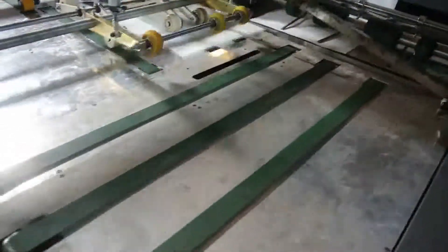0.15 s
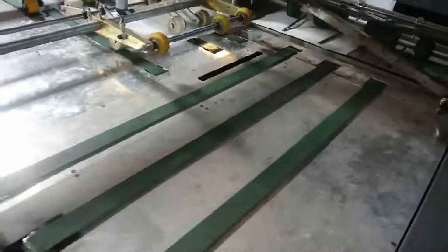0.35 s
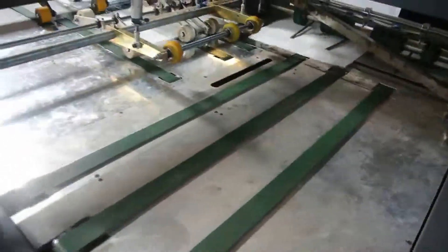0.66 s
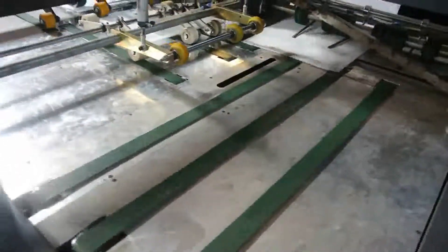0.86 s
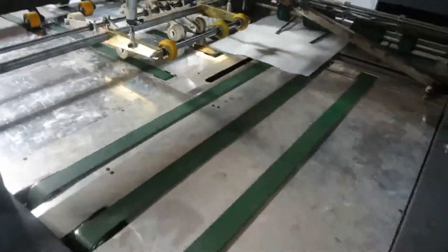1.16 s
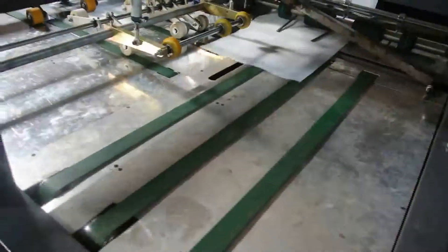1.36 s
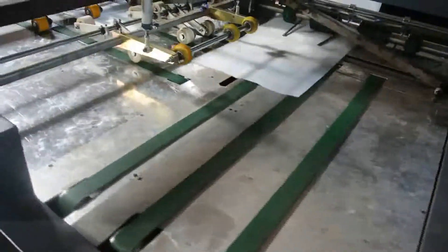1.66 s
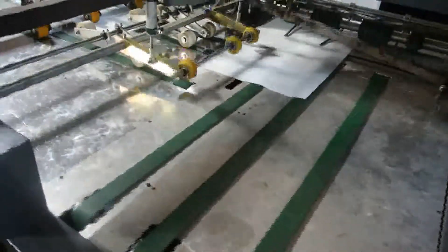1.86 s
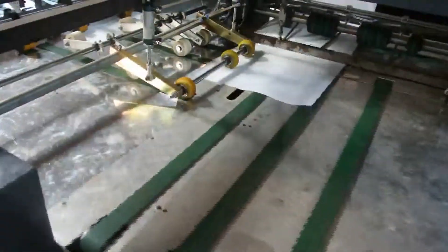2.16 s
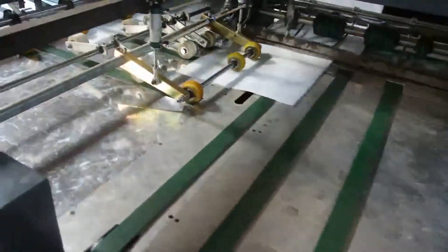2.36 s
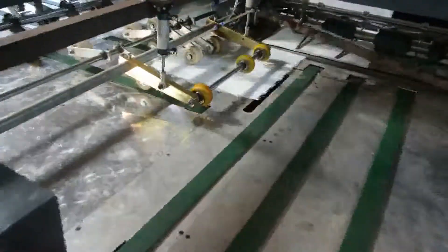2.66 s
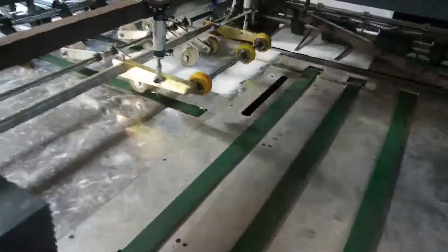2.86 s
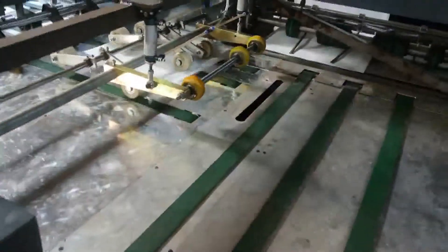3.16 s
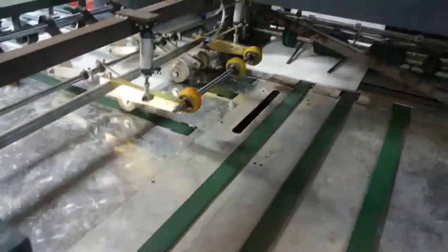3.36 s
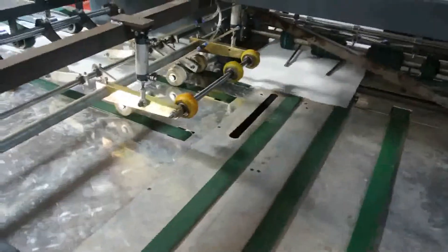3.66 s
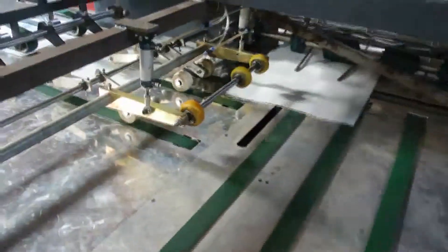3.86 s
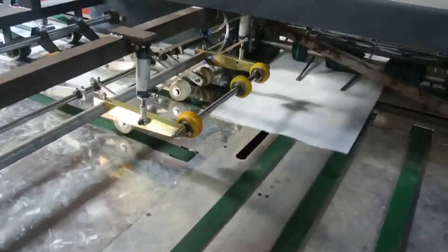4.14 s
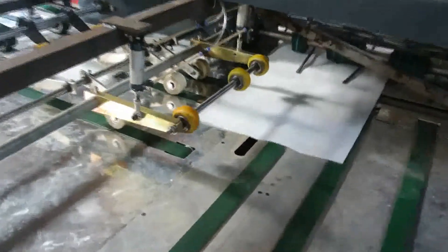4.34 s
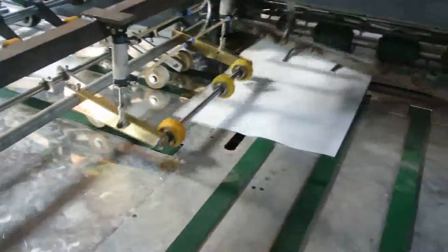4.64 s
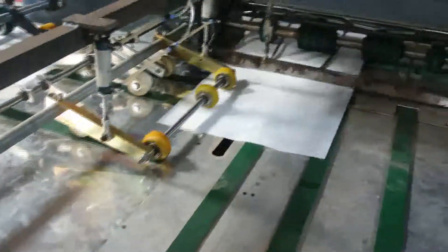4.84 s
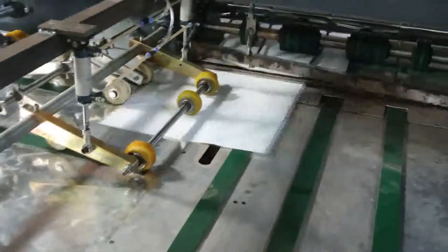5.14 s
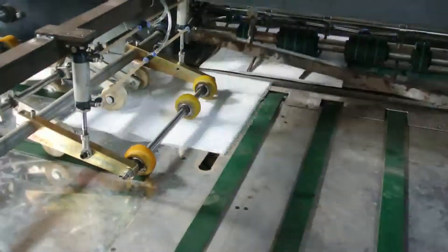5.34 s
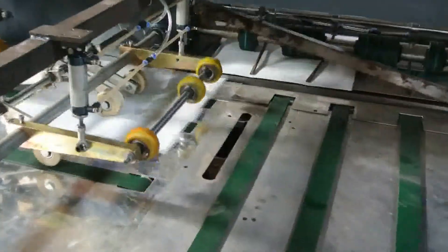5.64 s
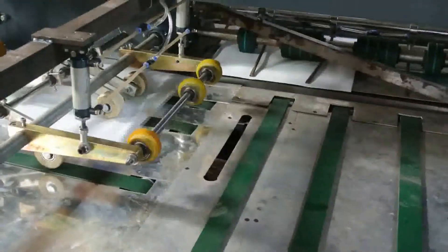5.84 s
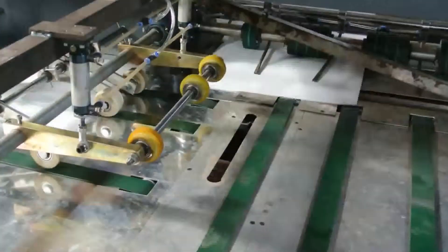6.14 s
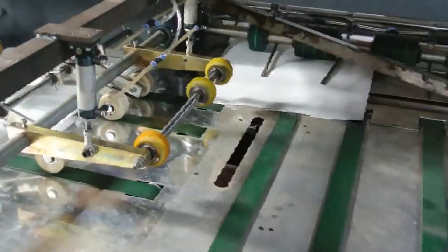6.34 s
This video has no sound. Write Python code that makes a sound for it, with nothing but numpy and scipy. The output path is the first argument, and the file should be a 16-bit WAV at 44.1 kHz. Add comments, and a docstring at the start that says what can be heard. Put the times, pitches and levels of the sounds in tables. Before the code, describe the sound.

An automatic pneumatic machine runs close by in a slightly reverberant workshop, its drive and conveyor belts rumbling softly with a faint motor hum throughout. It opens on a fading puff of air and a brief whistle. At about 0.5 seconds a valve snaps with a dull knock and releases a long, bright hiss, which ends in a spit at 1.7 seconds. A thin, wavering squeal follows, with short puffs, quick falling chirps and rasping rods. At 2.5 seconds a sharper rasp and puff lead into a short, swelling whistle. The valve snaps again at 3.2 seconds, and air blasts until about 4.4. The squeal, puffs and chirps return, followed by another rasp and whistle from 5.2 seconds. Near 6 seconds a softer snap starts a third blast, still hissing at the end.

```python
"""A workshop floor, close to a bag making machine running through its 2.75 s cycle.
A valve snaps and dumps a long blast of air; then the cylinders move, with short puffs,
falling chirps, rasping rods, a squealing throttle and a whistling port.
Under the air, the drive and its conveyor belts rumble on."""
import sys
import numpy as np
from scipy import signal
from scipy.fft import rfft, irfft, next_fast_len
from scipy.io import wavfile
from scipy.ndimage import uniform_filter1d, map_coordinates

SR = 44100
rng = np.random.default_rng(int(sys.argv[2]) if len(sys.argv) > 2 else 0)


def store_pcm(level_fs):
    """Save levels as 16-bit WAV."""
    pcm = np.round(np.clip(level_fs, -1, 1) * 32767).astype(np.int16)
    wavfile.write(sys.argv[1], SR, np.atleast_2d(pcm).T)


N = 286638

# valve snaps: t/s, snap level/dB, thump level/dB
SNAPS = [(0.4966, -11.5, -30), (3.227, -11.5, -53), (5.9686, -24.5, -55)]
# return strokes: t/s, air level/dB, end-stop spit/dB, whistle f/Hz, whistle level/dB,
# time to its peak/s, its swell/(dB/s), force of the down stroke before/dB
RETURN_STROKES = [(-0.236, 1, -32.5, 2045, -40.5, .42, 1, 0), (2.508, 1, -40, 2077, -36.5, 0.313, 52, 0),
                  (5.242, -1, -40, 2082, -32.5, 0.35, 37.5, 1)]


def amp(db):
    """Decibels to gain."""
    return 10 ** (np.asarray(db) / 20)


def unit(x):
    """Scale to rms 1."""
    return x / np.sqrt(np.mean(np.abs(x) ** 2) + 1e-20)


def along(points, hz):
    """Read (f/Hz, value) points on a log frequency axis."""
    freqs, values = np.transpose(points)
    return np.interp(np.log(hz + 1), np.log(freqs + 1), values)


def clock():
    """Time of every sample."""
    return np.arange(N) / SR


def since(start):
    """Seconds since start, zero before it."""
    return np.maximum(clock() - start, 0)


def held(start, db, rise, hold, t60):
    """Envelope that opens, holds and dies away."""
    return amp(db - 60 * since(start + hold) / t60) * (1 - np.exp(-(since(start) / rise) ** 2))


def burst(start, db, rise, t60):
    """Envelope that opens and dies away with no hold."""
    return held(start, db, rise, 0, t60)


def together(gains):
    """Independent air streams add in power."""
    return np.sqrt(sum(gain ** 2 for gain in gains))


def wobble(rate):
    """A smooth random curve, rate knots a second."""
    return map_coordinates(rng.standard_normal(int(N * rate / SR) + 4), [clock() * rate])


def eq(points):
    """Frequency response through (f/Hz, level/dB) points."""
    return lambda hz: amp(along(points, hz))


def filtered(x, response):
    """Shape x with a frequency response."""
    size = next_fast_len(N + 8192)
    return irfft(rfft(x, size) * response(np.fft.rfftfreq(size, 1 / SR)), size)[..., :N]


def rush(response, spread, patchy_db):
    """Turbulent stereo noise, patchy in time and frequency; spread sets side over mid."""
    spectra = signal.stft(rng.standard_normal((2, N)), nperseg=1024)[2]
    patches = uniform_filter1d(rng.standard_normal(spectra.shape[1:]), size=3, axis=0)
    patches = unit(uniform_filter1d(patches, size=14, axis=1))
    noise = signal.istft(spectra * amp(patchy_db * patches), nperseg=1024)[1][:, :N]
    mid, side = filtered(noise, response)
    mid, side = unit(mid), filtered(unit(side), eq(spread))
    return np.array([mid + side, mid - side])


def noisy_tone(pitch_hz, width_hz, clean):
    """A band of noise around a fixed or moving pitch; clean is the pure tone's share of the power."""
    real, imag = filtered(rng.standard_normal((2, N)), lambda hz: 1 / (1 + (1.84 * hz / width_hz) ** 2))
    flutter = np.sqrt(clean) + np.sqrt(1 - clean) * unit(real + 1j * imag)
    phase = 2 * np.pi * np.cumsum(np.broadcast_to(pitch_hz, N)) / SR
    return np.sqrt(2) * np.real(flutter * np.exp(1j * phase))


def hall(x, wet_db):
    """Blend a source with the workshop's diffuse reverb."""
    # reverb time: f/Hz, t60/s
    decay = [(200, 0.069), (2000, 0.7), (12000, 0.24)]
    hz, t, spectra = signal.stft(rng.standard_normal((2, SR // 2)), SR, nperseg=256)
    tail = signal.istft(spectra * amp(-60 * t / along(decay, hz)[:, None]), SR, nperseg=256)[1]
    tail = np.pad(tail / np.linalg.norm(tail[0]), ((0, 0), (SR // 300, 0)))  # pre-delay
    wet = signal.fftconvolve(np.atleast_2d(x), tail, axes=1)[:, :N]
    return (x + amp(wet_db) * wet) / np.sqrt(1 + amp(wet_db) ** 2 / 2)


def drive(cycle_s=2.752, fade_db_per_s=0.49):
    """Belts and rollers rumble with each cycle's load, beside unsteady motor tones; the rumble's level drops
    slowly through the scene."""
    # load through one cycle: t after the snap/s, level/dB
    load = [(0, -46.5), (.3, -47), (.5, -48.5), (1.25, -48.5), (1.501, -49.5), (1.63, -42.5), (1.9, -46),
            (2.15, -47.5), (2.7, -46)]
    # rumble colour: f/Hz, level/dB
    colour = [(25, -36), (50, -18.5), (100, -11), (170, -4.5), (380, -0.5), (900, 0), (1500, -1),
              (2200, -2.5), (4000, -7.5), (16000, -11.5)]
    # stereo width: f/Hz, side over mid/dB
    spread = [(40, -10), (160, -21), (600, -12), (1500, -4.5), (4000, -1)]
    # motor and roller tones: f/Hz, level/dB
    hum = [(383, -61.5), (497, -60), (631, -62.5), (829, -59), (1081, -66), (1394, -63), (1666, -60)]
    load_db = np.interp((clock() - SNAPS[0][0]) % cycle_s, *np.transpose(load))
    rumble = rush(eq(colour), spread, patchy_db=2.0)
    tones = sum(amp(db) * noisy_tone(hz, width_hz=12, clean=0.15) for hz, db in hum)
    return amp(load_db + 7.5 - fade_db_per_s * clock() + 0.4 * wobble(16)) * rumble + amp(-3) * tones


def knocks():
    """The frame gives a short, dull knock as each valve trips."""
    gain = sum(burst(start - 0.012, db=-41, rise=0.006, t60=0.2) for start, *_ in SNAPS)
    return gain * noisy_tone(pitch_hz=523, width_hz=330, clean=0)


def rasps(side_hz=3500):
    """The sliding rod rubs with each move: a band of noise, wider in stereo the higher it lies."""
    # rod rubs: t from the return/s, f/Hz, width/Hz, level/dB, rise/s, t60/s
    rubs = [(-.425, 3100, 700, -34, 0.035, 0.69), (-.287, 3600, 650, -30, 0.023, 0.36),
            (-.141, 1903, 1500, -26.5, .004, 0.19), (0, 5000, 560, -10.5, 0.016, .1)]
    out = np.zeros((2, N))
    for delay, hz, width_hz, db, rise, t60 in rubs:
        down_stroke = delay < -0.1
        gain = sum(burst(start + delay, db + force_db * down_stroke, rise, t60)
                   for start, *_, force_db in RETURN_STROKES)
        mid, side = (noisy_tone(hz, width_hz, clean=0) for _ in range(2))
        out += gain * (mid + np.outer([1, -1], side) * hz / side_hz)
    return out


def chirps():
    """The chamber behind a moving piston grows, so its note drops and settles."""
    # piston moves: t from the return/s, first f/Hz, last f/Hz, glide/s,
    # width/Hz, level/dB, rise/s, t60/s
    moves = [(-.4, 2202, 1029, .013, 800, -32.5, 0.013, 0.31),
             (-.289, 3986, 1850, .03, 480, -30.5, 0.013, 0.25),
             (-.139, 2400, 1059, .008, 240, -23.5, .007, 0.12),
             (-.001, 5230, 2160, .044, 360, -25.5, 0.013, .3)]
    out = np.zeros(N)
    for start, *_, force_db in RETURN_STROKES[1:]:
        for delay, first_hz, last_hz, glide, width_hz, db, rise, t60 in moves:
            pitch = last_hz + (first_hz - last_hz) / (1 + (since(start + delay) / glide) ** 3)
            down_stroke = delay < -0.1
            gain = burst(start + delay, db + force_db * down_stroke, rise, t60)
            out += gain * noisy_tone(pitch, width_hz, clean=0.14)
    return out


def whistles(sharp_hz=89.3, settle_s=0.045, sag_hz_per_s=45.4, flutter_db=2.3):
    """The port's whistle starts sharp, settles and sags; it swells, then drops to a faint tail."""
    out = np.zeros(N)
    for stroke, _, _, hz, db, peak_s, swell, _ in RETURN_STROKES:
        start, peak = stroke + 0.1, stroke + peak_s
        pitch = hz + sharp_hz * np.exp(-since(start) / settle_s) - sag_hz_per_s * since(start)
        swell_db = -swell * np.maximum(peak - clock(), 0)
        body = held(start, db + swell_db, rise=0.023, hold=peak - start, t60=0.15)
        tail = held(start, db - 13.5, rise=0.016, hold=0.53, t60=0.26)
        out += together([body, tail]) * noisy_tone(pitch, width_hz=70, clean=0.59)
    return out * amp(-flutter_db * wobble(40))


def throttle(length_s=0.52, push_after_s=0.248, flutter_db=3.0):
    """The throttle's note flutters in the flow and sinks with the pressure; a second push revives it."""
    # down-stroke squeals: t/s, level/dB, rise/s, t60/s, second push/dB
    squeals = [(1.775, -28, .006, 1.1, -43), (4.511, -35, 0.047, 1.9, -28)]
    # pitch bend: t into the squeal/s, f/Hz
    bend = [(0, 3824), (.07, 3590), (.2, 3414), (.3, 3270), (.43, 3480)]
    out = np.zeros(N)
    for start, db, rise, t60, push_db in squeals:
        pitch = np.interp(since(start), *np.transpose(bend))
        push = burst(start + push_after_s, push_db, rise=0.013, t60=0.25)
        release = np.exp(-since(start + length_s) / 0.02)
        gain = together([burst(start, db, rise, t60), push]) * release
        out += gain * noisy_tone(pitch, width_hz=220, clean=0.29)
    return out * amp(flutter_db * wobble(60))


def vent():
    """On each return, escaping air rings the resonances of the narrow port."""
    # port resonances: f/Hz, width/Hz, level/dB
    resonances = [(2670, 1200, -10.5), (3870, 2400, -11), (4700, 400, -5.5), (5000, 210, 0)]

    def port(hz):
        return together(amp(db) / (1 + (2.9 * (hz - centre) / width) ** 2)
                        for centre, width, db in resonances)

    gain = sum(burst(start, air_db - 28, rise=0.04, t60=1.44) for start, air_db, *_ in RETURN_STROKES)
    return gain * amp(2.9 * wobble(40)) * rush(port, spread=[(2500, -5), (5000, 1.5)], patchy_db=2.4)


def return_flow(start, stop_db, travel_s=0.412):
    """Envelope of a return: a puff, a hiss while the piston travels, an end-stop spit, a faint leak."""
    return together([burst(start - 0.006, db=-26.5, rise=0.011, t60=0.62),
                     held(start, db=-41.3, rise=0.02, hold=travel_s, t60=0.54),
                     burst(start + travel_s, stop_db, rise=0.003, t60=0.12),
                     held(start, db=-49.5, rise=0.02, hold=0.28, t60=1.4)])


def bleed(bright_hz=12000, brightening=0.58, neutral_db=-35):
    """Softer puffs from the far cylinders; the stronger the flow, the brighter its hiss."""
    # down-stroke puffs: t/s, level/dB, rise/s, t60/s
    puffs = [(1.73, -30, 0.013, 2.4), (2.005, -32, 0.013, 1.95), (2.211, -27, 0.013, 0.7),
             (4.47, -36.5, 0.013, 12), (4.768, -33, .02, 1.14), (4.95, -26.5, 0.023, 0.89)]
    # hiss colour, down stroke then return: f/Hz, level/dB
    colours = [
        [(880, -34), (1500, -20.5), (2040, -13), (2490, -6.5), (2910, -7.5), (3410, -0.5), (4970, -3),
         (13800, -4), (15100, -6), (16000, -27)],
        [(1000, -38), (2000, -4), (3000, -2.5), (4300, 0), (6000, -2), (9000, -1), (12500, 0.5), (15000, -8),
         (16000, -1)],
    ]
    # stereo width: f/Hz, side over mid/dB
    spread = [(1500, -3), (3500, 1.5), (5000, 0.5), (8000, 1), (15000, -.5)]
    down = together(burst(*puff) for puff in puffs)
    back = together(amp(air_db) * return_flow(start, stop_db)
                    for start, air_db, stop_db, *_ in RETURN_STROKES)
    air = np.zeros((2, N))
    for flow, colour in zip((down, back), colours):
        jet = rush(eq(colour), spread, patchy_db=2.1)
        sizzle = filtered(jet, lambda hz: hz ** 6 / (hz ** 6 + bright_hz ** 6))
        brightness = (flow / amp(neutral_db)) ** brightening
        air += flow * (jet - sizzle + sizzle * brightness)
    return air * amp(2.4 + 0.1 * wobble(64))


def valves(lead_s=0.01):
    """The mechanism thumps the frame; then the valve snaps open with a crack and a brief rattle."""
    # colours: f/Hz, level/dB
    steel = eq([(200, -1), (1500, 8.5), (3500, 7), (6000, 0), (13000, 9)])
    frame = eq([(25, -13), (110, 2.5), (500, -1), (1300, 1), (4000, -29), (12000, -45)])
    crack = np.zeros(N)
    for start, db, _ in SNAPS:
        crack[round(start * SR)] = amp(db + 6)
    rattle = sum(burst(start, db - 8.5, rise=0.0001, t60=0.0075) for start, db, _ in SNAPS)
    thump = sum(burst(start - lead_s, db, rise=0.00069, t60=0.088) for start, _, db in SNAPS)
    steel_noise = unit(filtered(rng.standard_normal(N), steel))
    frame_noise = unit(filtered(rng.standard_normal(N), frame))
    return filtered(crack, steel) + rattle * steel_noise + thump * frame_noise


def blasts(open_s=1.22):
    """The exhaust opens with a kick, surges, settles to a steady hiss and spits as it closes."""
    # exhaust blasts: t/s, surge/dB, surge length/s, steady hiss/dB, spit/dB, left over right/dB
    exhausts = [(0.491, -31, 0.33, -30, -24.5, -0.5), (3.222, -29, 0.41, -29.5, -28.5, -.3),
                (5.964, -29, 0.33, -32.5, -30, 1)]
    # colour of each blast: f/Hz, level/dB
    colours = [
        [(1060, -35), (1800, -15), (1940, -23), (2100, -13), (2820, -6), (3260, -5), (4100, -6), (4410, -4.5),
         (5590, -3.5), (7420, -0.5), (10200, -3.5), (12400, -1.5), (15100, -5), (16000, -7.5)],
        [(1060, -35), (1800, -20), (2060, -11), (2410, -12), (2690, -5.5), (3810, -4.5), (4490, -5),
         (4880, -3.5), (6410, -4), (8440, -0.5), (10100, -4), (13100, -0.5), (15100, -7.5), (16000, -1)],
        [(1060, -37), (1800, -17), (2030, -13.5), (2200, -14), (2790, -7.5), (3440, -8.5), (5060, -4.5),
         (5750, -7.5), (7290, -6.5), (8210, -7.5), (12100, -2), (15000, -5), (16000, -6)],
    ]
    # stereo width of each blast: f/Hz, side over mid/dB
    spreads = [
        [(2000, -5), (8500, -4.3), (11000, -1.5), (15000, 3.5)],
        [(2000, -6), (8500, -3.5), (11000, -1), (15000, 2.5)],
        [(3000, -9), (7500, -2.5), (11500, -4), (15000, -1)],
    ]
    air = np.zeros((2, N))
    for exhaust, colour, spread in zip(exhausts, colours, spreads):
        start, surge_db, surge_s, steady_db, spit_db, pan_db = exhaust
        wisp = held(start - 0.014, db=-33, rise=0.01, hold=0.02, t60=0.05)  # the valve unseats
        kick = burst(start, db=-23, rise=0.018, t60=0.57)
        surge = held(start, surge_db, rise=0.003, hold=surge_s, t60=0.85)
        steady = held(start, steady_db, rise=0.0036, hold=open_s, t60=0.4)
        spit = burst(start + open_s, spit_db, rise=0.0039, t60=0.44)
        pan = amp([[pan_db / 2], [-pan_db / 2]])
        jet = rush(eq(colour), spread, patchy_db=2.0)
        air += pan * together([wisp, kick, surge, steady, spit]) * jet
    return air * amp(2.0 + 0.49 * wobble(35) + 0.25 * wobble(6))


def scene(low_cut_hz=400):
    """Air and machinery in the workshop; the whistle sits a little left, the rods a little right."""
    whistle = amp([[0], [-2.5]]) * hall(whistles(), wet_db=-7.5)
    squeal = amp(-1) * hall(throttle(), wet_db=-0.5)
    chambers = amp(1.5) * hall(chirps(), wet_db=-1.5)
    rods = amp([[-2], [-0.5]]) * hall(rasps(), wet_db=-4.5)
    # the piston sounds are kept clear of bass
    pistons = filtered(chambers + rods, lambda hz: hz ** 2 / (hz ** 2 + low_cut_hz ** 2))
    air = blasts() + bleed() + vent()
    impacts = hall(valves() + knocks(), wet_db=-7)
    return drive() + impacts + pistons + whistle + squeal + air


def record(dry, top_hz=15900):
    """Colour left and right slightly apart and cut the very top."""
    # channel balance: f/Hz, left over right/dB
    balance = [(60, 0.0), (150, -0.5), (380, 0.0), (950, 0), (2380, -1.5), (5980, -0.5), (15000, 4)]
    return filtered(dry, lambda hz: amp(np.outer([0.5, -0.5], along(balance, hz))) * (hz < top_hz))


dry = scene()
out = record(dry)
store_pcm(out)
```